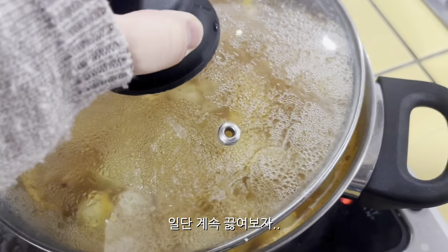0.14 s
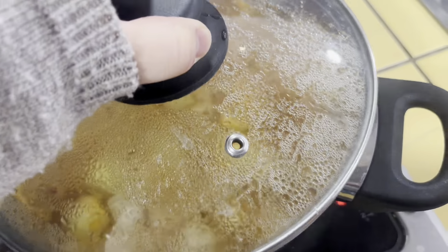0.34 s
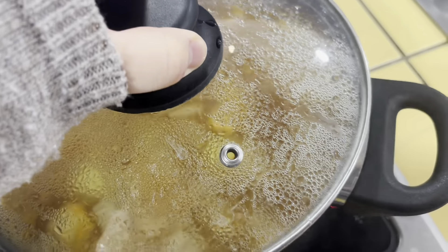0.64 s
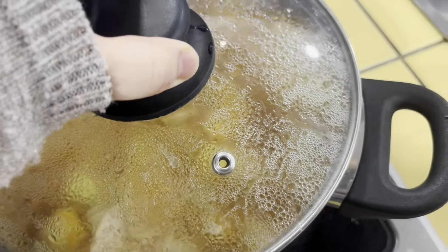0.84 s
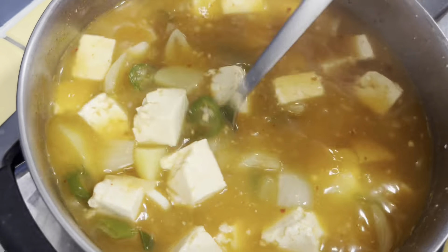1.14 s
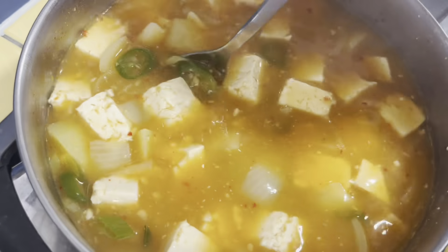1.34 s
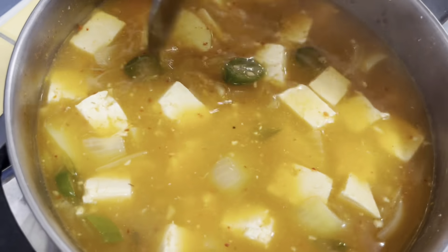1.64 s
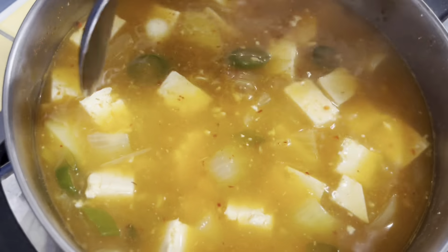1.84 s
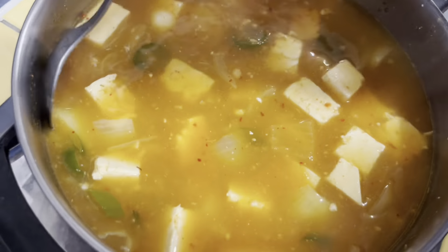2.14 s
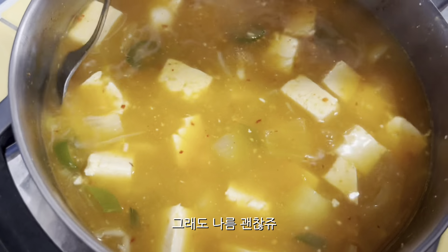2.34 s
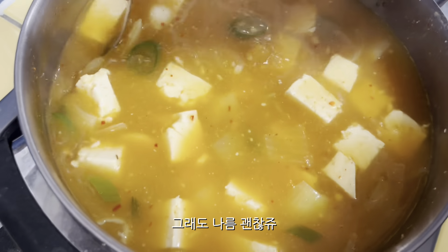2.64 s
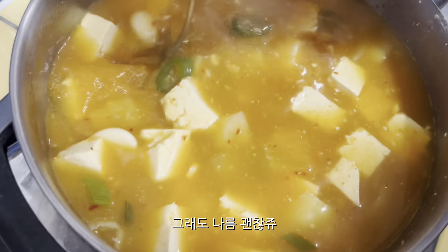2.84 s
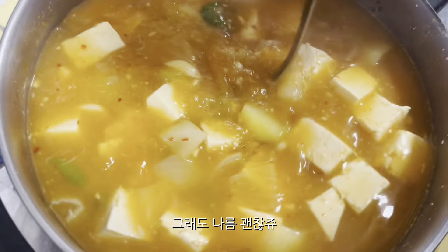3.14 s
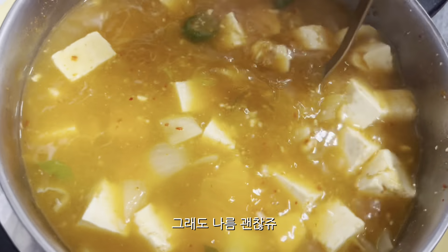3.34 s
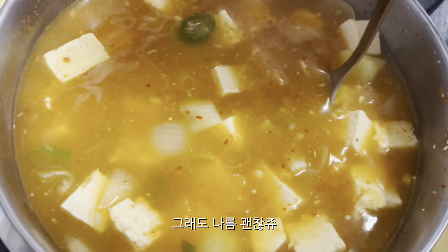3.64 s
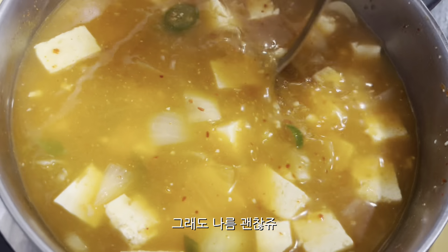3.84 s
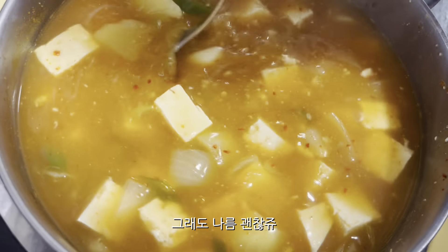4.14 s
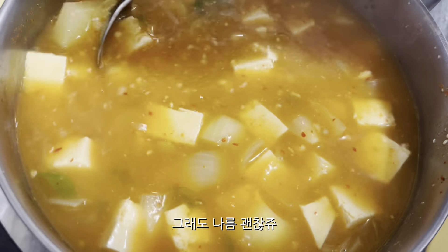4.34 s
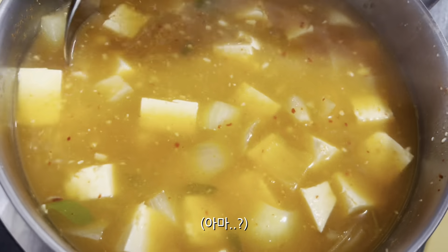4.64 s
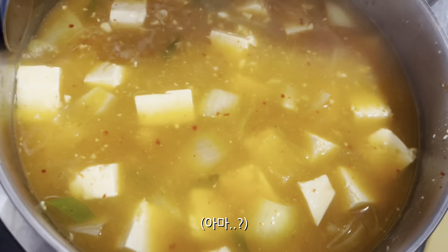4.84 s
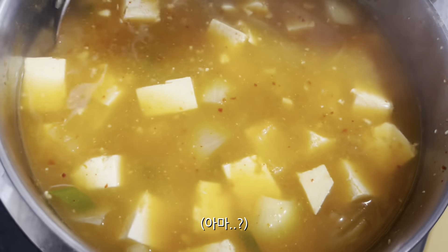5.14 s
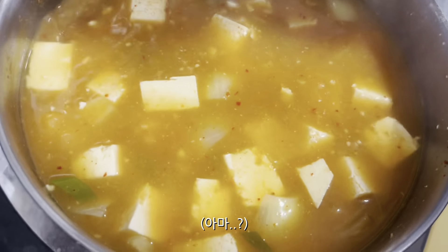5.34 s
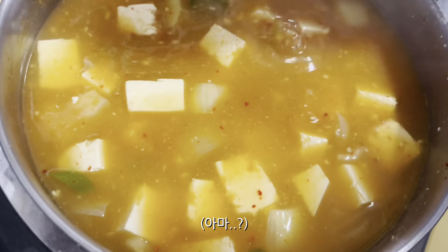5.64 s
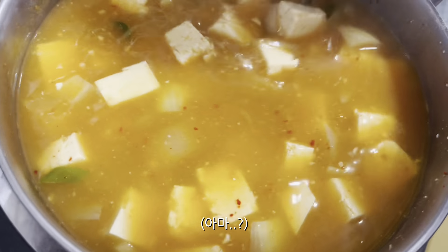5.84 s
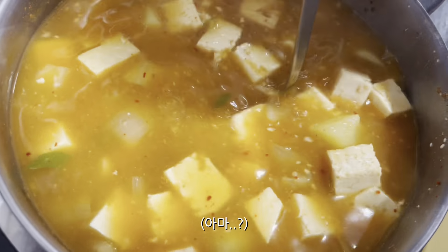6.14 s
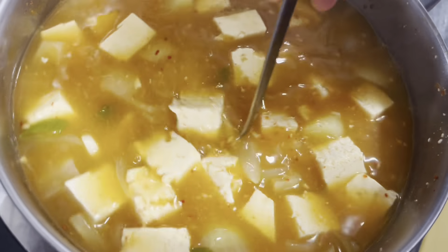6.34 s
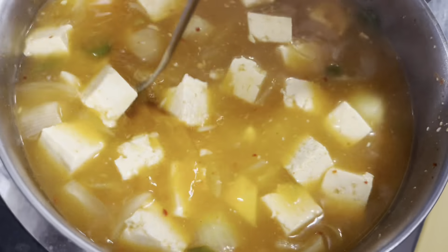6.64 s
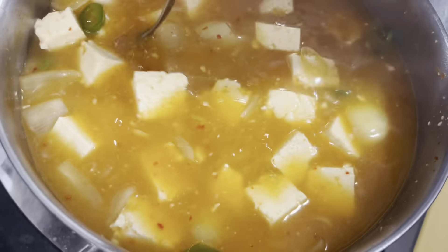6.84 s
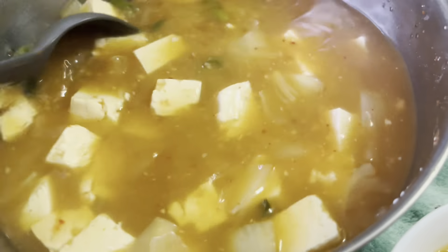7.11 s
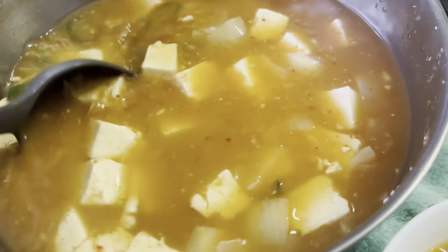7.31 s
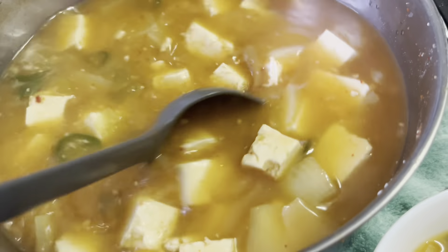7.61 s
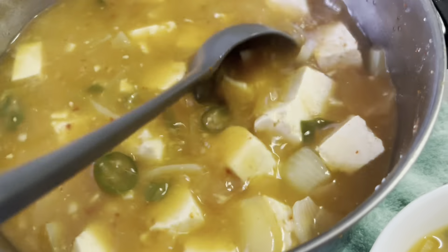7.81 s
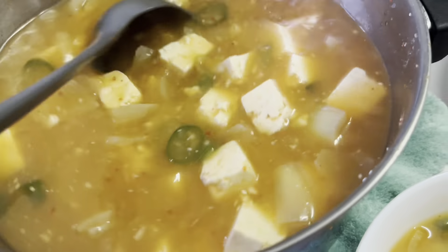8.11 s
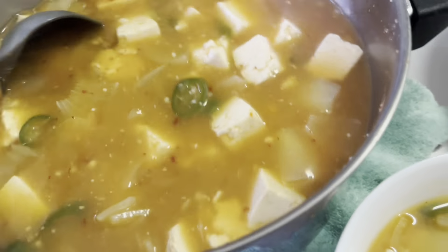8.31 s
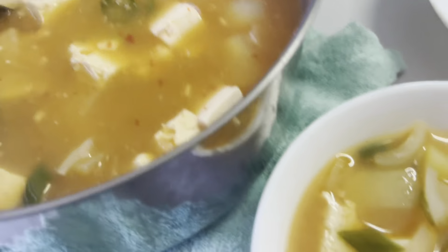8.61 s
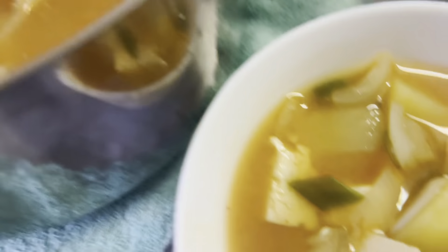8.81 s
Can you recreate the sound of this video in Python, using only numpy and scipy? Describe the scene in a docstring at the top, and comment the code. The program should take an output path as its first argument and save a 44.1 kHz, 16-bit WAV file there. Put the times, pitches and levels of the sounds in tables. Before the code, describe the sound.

Lid rattling on a pot rim gives way to simmering broth with popping bubbles and metal spoon scrapes, cutting abruptly to a faint, quiet kitchen.

```python
"""A thick tofu stew simmers in a steel pot, heard from just above: rumble, churning, plops and crackle. Bubbles
are short gliding notes; broth and rumble are noise and random clicks shaped by spectra. A glass lid clatters
and slides on the rim, from struck modes and streams of slips; then a steel spoon knocks, scrapes and rocks the
pot. Then the quiet kitchen holds sleeve swishes from random clicks and noise, ticks of a ladle from resonated
noise, and a soft handling rumble over room tone."""
import sys
import numpy as np
from scipy import signal
from scipy.fft import rfft, irfft, next_fast_len
from scipy.io import wavfile
from scipy.ndimage import uniform_filter1d

SR = 44100
rng = np.random.default_rng(int(sys.argv[2]) if len(sys.argv) > 2 else 0)


def digitize_waveform(pressure):
    """Quantize a signal to 16-bit integers and store it at the path in sys.argv[1].

    Rows of a 2-D input are taken as channels; values are limited to [-1, 1].
    """
    field = np.atleast_2d(pressure).T
    bounded = np.clip(field, -1, 1)
    quanta = np.round(bounded * 32767).astype(np.int16)
    wavfile.write(sys.argv[1], SR, quanta)


N = 395573
TIME = np.arange(N) / SR  # s
PADDED = next_fast_len(N + SR // 2)
FREQS = np.maximum(np.arange(PADDED // 2 + 1) * SR / PADDED, 1)  # Hz
LID_ENDS_S, STIR_ENDS_S = .920, 6.950

# level of the boil, with the dragged spoon's rumble near 3.8 s, before trims:
# t/s, bottom level/dB, surface level/dB
SIMMER_LEVEL = [(0.0, -41, -53), (0.88, -45, -47.5), (1.0, -50.5, -60.5), (1.28, -47, -53),
                (2.6, -47.5, -50.5), (2.95, -41.5, -44), (3.33, -53, -59.5), (3.64, -53, -58.5),
                (3.76, -42.5, -47.5), (3.9, -40.5, -51), (4.0, -48.5, -58.5), (4.95, -47.5, -57),
                (5.6, -45, -49.5), (6.3, -46.5, -52.5), (6.94, -46.5, -53)]
# low rumble at the bottom: f/Hz, level/dB per Hz
RUMBLE = [(20, -31), (38, -11.5), (55, 5.5), (75, 1), (98, 6), (130, -2), (200, -15.5), (400, -83.5)]
# churning of the thick broth: f/Hz, level/dB per Hz
CHURN = [(100, -18.5), (150, -8), (190, 15.5), (230, -0.5), (280, 4), (370, -6.5), (520, -4), (1000, -47)]
# lapping of the thick broth: f/Hz, level/dB per Hz
SLOSH = [(200, 0.5), (330, -10), (800, 0), (1200, -15), (2200, -16), (2700, -28), (3500, -30.5),
         (8000, -41.5), (15500, -62.5)]
# crackle of the surface: f/Hz, level/dB per Hz
BROTH = [(250, 0), (450, -11), (800, -3), (1200, -18), (2000, -29), (3200, -35), (5000, -45), (8000, -31),
         (11000, -41), (15500, -50)]
SEETHE_PER_S, SEETHE_DB = 9.8, 1.17  # uneven surges: rate, spread
CHURN_DB, COVERED_CHURN_DB = -5.5, 4  # churning against the rumble; its extra gain under the lid
LAPS_PER_S, LAP_DECAY_S, LAP_SPREAD_DB = 14, 0.013, 4.5
LAP_REST = 0.13  # steady part of the lapping, against laps of unit power
CRACKLE_HZ = np.geomspace(380, 11000, 17)
CRACKLE_PER_S, CRACKLE_SPREAD_DB, CRACKLE_Q = 420, 3.3, 5
CLUSTER_DB = 2.5  # spread of the crackle's slow swings


def simmer():
    """Steam (near 3.8 s also the dragged spoon) rumbles low, broth churns and laps, bubbles crackle on top."""
    rumble, wet = gains(SIMMER_LEVEL) * from_db(SEETHE_DB * drift(SEETHE_PER_S))
    deep = rumble * colour(rng.standard_normal(N), RUMBLE)
    churn_gain = from_db(CHURN_DB + COVERED_CHURN_DB * until(LID_ENDS_S))
    churning = churn_gain * rumble * colour(grains(700, 1.5), CHURN)

    # each lap starts suddenly, then dies away
    lap_decay = np.exp(-1 / (LAP_DECAY_S * SR))
    laps = signal.lfilter([1], [1, -lap_decay], np.abs(grains(LAPS_PER_S, LAP_SPREAD_DB)))
    lapping = colour(grains(2000, 3.0) * (LAP_REST + rms_one(laps)), SLOSH)

    pops = np.zeros(N)
    for hz in CRACKLE_HZ:
        clicks = grains(CRACKLE_PER_S / len(CRACKLE_HZ), CRACKLE_SPREAD_DB) + 1e-18
        pops += signal.lfilter(*signal.iirpeak(hz, CRACKLE_Q, SR), clicks)
    crackle = colour(pops * from_db(CLUSTER_DB * drift(22)), BROTH)

    small = np.zeros(N)
    for when, size, strength in rng.random((900, 3)):
        level = from_db(-16 * strength - 20 * size)  # the higher notes are weaker
        add(small, when * STIR_ENDS_S, level * bubble(360 * 6.5 ** size, cycles=15, rise=.08))
    return [deep + from_db(-6.0) * wet * crackle,
            churning + from_db(-8) * wet * rms_one(small),
            from_db(-10.0) * wet * lapping]


# largest plops in the broth, before trims: t/s, level/dB, f/Hz, snap level/dB
PLOPS = [(1.014, -41, 474, -56), (1.102, -44.5, 894, -66), (1.241, -48, 845, -66), (1.35, -41.5, 800, -61),
         (1.384, -41.5, 860, -63), (1.442, -42, 470, -61), (1.479, -37, 830, -61), (1.551, -42, 460, -62),
         (1.561, -42, 790, -68), (1.653, -33.5, 760, -63), (1.733, -54, 439, -60), (1.801, -37.5, 450, -58),
         (1.812, -43.5, 844, -70), (1.931, -42.5, 830, -58), (2.289, -41, 416, -55), (2.535, -35, 447, -51),
         (2.709, -49, 810, -61.5), (2.968, -30.5, 370, -54), (3.067, -45, 1096, -55),
         (3.276, -43, 840, -67), (3.585, -39.5, 810, -57), (3.603, -41, 470, -64), (3.698, -48, 450, -58.5),
         (3.806, -43, 480, -59), (3.967, -33, 830, -64), (3.997, -39.5, 450, -59.5),
         (4.079, -34, 435, -52.5), (4.199, -37, 800, -57.5), (4.219, -32.5, 813, -60),
         (4.246, -36.5, 560, -61), (4.291, -37, 720, -58.5), (4.422, -37.5, 425, -67),
         (4.506, -37, 463, -63), (4.651, -46, 460, -78), (4.899, -41.5, 797, -63), (5.063, -39, 834, -57),
         (5.162, -35.5, 795, -65), (5.368, -38, 614, -57), (5.445, -38, 433, -54), (6.171, -52, 470, -52),
         (6.315, -42, 431, -56), (6.415, -43, 403.3, -57), (6.418, -41, 885, -64), (6.459, -44, 712, -52),
         (6.551, -37.5, 405, -61), (6.789, -38, 450, -48.5), (6.863, -27, 394, -60)]
# clearest clicks of bursting films, before trims: t/s, level/dB
FILM_CLICKS = [(3.9436, -54), (4.5988, -48.5), (4.832, -56.5), (4.861, -53.5), (6.3557, -50), (6.459, -57),
               (6.478, -53)]
# largest low bumps: steam pockets, and near 3.8 s the pot rocking under the dragged spoon:
# t/s, level/dB, f/Hz
BUMPS = [(1.248, -38, 134), (1.522, -34.5, 179), (2.788, -36, 128), (3.448, -33, 102), (3.76, -32, 56.7),
         (3.851, -34, 56.3), (4.175, -34, 96.3), (5.913, -38, 110), (6.142, -37, 112.6)]
# lesser events come at random: rate, strongest level before trims, spread below it
PLOPS_PER_S, LESSER_PLOP_DB, PLOP_SPREAD_DB = 24, -47, 10
FILMS_PER_S, LESSER_FILM_DB, FILM_SPREAD_DB = 6.2, -59, 9
BUMPS_PER_S, LESSER_BUMP_DB, BUMP_SPREAD_DB = 5.7, -42.5, 12.5
PLOP_LOW_HZ, PLOP_HIGH_HZ, BUMP_LOW_HZ, BUMP_HIGH_HZ = 340, 850, 96, 126
PLOP_RING_DB, PLOP_CYCLES = 2, 14  # trim of a plop's ring; cycles to fall 60 dB
PLOP_GLIDE = -0.058  # negative: the pitch falls
LESSER_SNAP_DB = -25.5  # snap of a lesser plop against its level
SNAP_RING_DB, SNAP_CYCLES, SNAP_LOW_HZ, SNAP_HIGH_HZ = 5, 9, 1150, 2310  # the torn film rings briefly
FILM_SNAP_DB = -7.5  # trim of a film's share of the snap sound


def plops():
    """Bubbles snap and ring at three spots; films click; steam pockets and the rocking pot bump low."""
    spots = np.zeros((3, N))
    bumps, snaps, ticks = np.zeros((3, N))
    chance_plops = at_random(PLOPS_PER_S, LESSER_PLOP_DB, PLOP_SPREAD_DB, PLOP_LOW_HZ, PLOP_HIGH_HZ)
    lesser = [(s, db, hz, db + LESSER_SNAP_DB) for s, db, hz in chance_plops]
    for k, (s, db, hz, snap_db) in enumerate(list(PLOPS) + lesser):
        spot = spots[k % len(spots)]
        film_hz = rng.uniform(SNAP_LOW_HZ, SNAP_HIGH_HZ)
        add(spot, s, from_db(db + PLOP_RING_DB) * bubble(hz, PLOP_CYCLES, PLOP_GLIDE))
        add(spot, s, from_db(snap_db + SNAP_RING_DB) * bubble(film_hz, SNAP_CYCLES, PLOP_GLIDE))
        add(snaps, s, from_db([snap_db]))

    chance_films = at_random(FILMS_PER_S, LESSER_FILM_DB, FILM_SPREAD_DB)
    for s, db, *_ in list(FILM_CLICKS) + chance_films:
        add(snaps, s, from_db([db + FILM_SNAP_DB]))
        add(ticks, s, from_db([db]))

    chance_bumps = at_random(BUMPS_PER_S, LESSER_BUMP_DB, BUMP_SPREAD_DB, BUMP_LOW_HZ, BUMP_HIGH_HZ)
    for s, db, hz in list(BUMPS) + chance_bumps:
        add(bumps, s, from_db(db) * bubble(hz, cycles=20, rise=.02))

    snap_spectrum = [(300, -12.5), (900, 16.5), (2200, 3.5), (2800, -9), (3600, -12), (5000, -25),
                     (8500, -22.5), (15500, -23.0)]
    tick_spectrum = [(1500, -4.5), (5000, -9.0), (8000, 19), (11000, -2), (15500, -15.0)]
    snap = from_db(-73.0) * colour(snaps, snap_spectrum)
    tick = from_db(-83.0) * colour(ticks, tick_spectrum)
    return [*spots, bumps + snap + tick]


def bubble(hz, cycles, rise):
    """A short bubble-like note, falling 60 dB in some cycles while its pitch glides."""
    t = TIME[:SR // 6]
    age = t * hz / cycles
    swell = 1 - np.exp(-t * hz * 4.5)
    return from_db(-60 * age) * swell * np.sin(2 * np.pi * hz * t * (1 + rise * np.minimum(age, 1)))


def at_random(per_s, top_db, spread_db, low_hz=1, high_hz=1):
    """Rows (t/s, level/dB, f/Hz) of chance events before the stirring sounds stop."""
    wait, size, pitch = rng.random((400, 3)).T
    times = np.cumsum(-np.log(1 - wait)) / per_s
    rows = np.transpose([times, top_db - spread_db * size, low_hz * (high_hz / low_hz) ** pitch])
    return [tuple(row) for row in rows if row[0] < STIR_ENDS_S]


# spoon on the pot; the last row is the body of a heavy plop; before trims:
# t/s, thud level/dB, clank level/dB, ring level/dB, struck spot's note f/Hz, note level/dB
POT_KNOCKS = [(1.995, -29, -31, -49.5, 1780, -24.5), (2.37, -38.5, -32.5, -34, 2000, -33.5),
              (2.797, -46, -42.5, -50.5, 2240, -47), (2.987, -48.5, -55.5, -67, 367, -39),
              (3.748, -47, -53, -67, 183.6, -33.5), (3.847, -45, -66, -66.5, 200, -31.5),
              (4.776, -31.5, -35, -75, 363, -34.5), (4.795, -29, -42, -58.5, 358, -30),
              (5.082, -47, -44, -50.5, 770, -49), (5.545, -36.5, -38.5, -36.5, 1330, -42),
              (5.667, -44, -36.5, -40, 1350, -32.5), (6.808, -43, -36.5, -40, 1400, -37),
              (6.864, -46.5, -38, -78, 381.5, -38)]
# modes of the full pot: f/Hz, level/dB, t60/s
POT_MODES = [(190.8, 2, 0.18), (360.6, 1, 0.12), (508, -2.5, 0.058), (741, -9.5, 0.14), (860, -2.5, 0.072),
             (1330, -21.5, 0.1), (1750, -25.5, 0.018), (1990, -17, 0.028), (3360, 1, 0.025),
             (8050, -2.5, 0.025)]
# strokes along the steel, before trims: start t/s, firmest t/s, end t/s, grit level/dB, hiss level/dB
STROKES = [(2.09, 2.33, 2.35, -65.5, -62), (2.38, 2.41, 2.8, -69, -77), (2.49, 2.575, 2.623, -52.5, -60.5),
           (2.8, 2.82, 2.98, -55, -57), (2.96, 3.015, 3.067, -58.5, -58), (3.05, 3.07, 3.2, -68.5, -78),
           (5.085, 5.11, 5.18, -63, -57), (5.22, 5.29, 5.37, -62, -57), (5.39, 5.58, 5.8, -61.5, -60),
           (5.67, 5.69, 5.91, -60, -64.5), (5.98, 6.13, 6.25, -64, -66), (6.22, 6.29, 6.5, -70.5, -72),
           (6.812, 6.83, 7.03, -58, -71)]
# steady resonances of the dragged spoon: f/Hz, width/Hz, level/dB
SPOON_MODES = [(2140, 180, -0.5), (2850, 66, -2.5), (5870, 120, -12.5), (7040, 41, -22.5),
               (6800, 28, -21.5), (7200, 180, -8.5), (8380, 84, -1), (9540, 300, -8.5)]
# scrape of steel on steel: f/Hz, level/dB per Hz
SCRAPE = [(300, 10), (800, -1.5), (1300, -9), (2200, -15.5), (3300, -9), (4500, -17.5), (6000, -18.5),
          (7200, -12), (8400, -15), (10500, -25.5), (13000, -23), (15500, -28)]
PRESSURE_DB, PRESSURE_PER_S = 0.5, 18  # the hand presses unevenly: spread, rate
# each slip returns from the rim, sooner or later as the spoon travels
SLIP_ECHO_S, CONTACT_TRAVEL, SLIP_ECHO_DB = 0.000469, 0.057, -11


def spoon():
    """Spoon knocks (and one heavy plop) ring the pot; the drag is tiny uneven slips that the steel colours."""
    struck = knocks(POT_KNOCKS, POT_MODES, ring_db=2.0,
                    clatter_db=[(200, -25.5), (800, -27.5), (3000, -27), (10000, -23.0)],
                    clatter_length=0.24, swell_cycles=1.8, detune=0.31,
                    crack_db=3.5, tick_db=2.0, note_cycles=40.4)
    strokes = swells(STROKES, ease_in_db=9.0, ease_out_db=7.0, attack_s=0.014, release_s=0.028)
    grit, hiss = strokes * from_db(PRESSURE_DB * drift(PRESSURE_PER_S))
    slips = grains(7000, 3.2) * from_db(2.2 * drift(160))

    # many narrow steel modes come and go as the point of contact travels
    steel = np.zeros(N)
    for hz in np.geomspace(900, 12000, 44):
        steel += from_db(4.2 * drift(22)) * signal.lfilter(*signal.iirpeak(hz, hz / 90, SR), slips)
    rubbed = rms_one(steel) + from_db(-3) * rms_one(slips)
    echo_delay = SLIP_ECHO_S * np.exp(CONTACT_TRAVEL * drift(9))
    returned = np.interp(TIME - echo_delay, TIME, rubbed)

    resonances = sum(from_db(db) * resonate(slips, hz, width) for hz, width, db in SPOON_MODES)
    scrape = colour(rubbed + from_db(SLIP_ECHO_DB) * returned, SCRAPE)
    scrape = scrape + from_db(-18) * rms_one(resonances)
    low = signal.sosfilt(signal.butter(2, [700, 6000], "band", fs=SR, output="sos"), scrape)
    high = signal.sosfilt(signal.butter(4, 6500, "high", fs=SR, output="sos"), scrape)
    return [struck, from_db(2.5) * grit * rms_one(low) + from_db(7.0) * hiss * rms_one(high)]


# lid on the rim, before trims: t/s, thud level/dB, clank level/dB, ring level/dB,
# struck spot's note f/Hz, note level/dB
LID_KNOCKS = [(0.010, -19, -20.5, -36, 810, -13), (0.034, -27, -23, -37, 730, -16),
              (0.138, -23, -19.5, -30, 655, -12.5), (0.159, -28, -42, -43, 1420, -30),
              (0.232, -37.5, -38, -52, 650, -30), (0.246, -38.5, -36, -47.5, 1420, -34.5),
              (0.275, -39, -42, -48, 624, -29), (0.383, -38, -48.5, -54.5, 580, -27),
              (0.472, -52, -60, -85, 1580, -44), (0.494, -26, -44, -45, 610, -18),
              (0.509, -22, -43, -50.5, 294, -27), (0.587, -37, -41.5, -50, 1150, -32),
              (0.609, -43.5, -49, -59, 1010, -33), (0.693, -39, -43, -56, 1270, -32),
              (0.718, -50, -47, -70, 1330, -48), (0.738, -40.5, -46.5, -73, 1230, -31),
              (0.755, -32, -52, -65, 273, -38), (0.843, -38, -64, -59, 300, -32),
              (0.885, -20, -32, -43.5, 289.4, -27), (0.905, -21, -29.5, -45.5, 860, -18.5)]
# modes of the lid lying on the pot: f/Hz, level/dB, t60/s
LID_MODES = [(180, -2, .25), (196, -5, .3), (258, -2, .2), (295, -3, .12), (505, -1, .14), (625, -5, .18),
             (664, -2, .22), (752, -1, .1), (790, 0, .11), (910, -5, .05), (1045, -4, .07), (1175, -3, .09),
             (1320, -1, .11), (1400, 3, .13), (1470, 0, .06), (1548, 2, .08), (2032, -2.5, .16),
             (2075, -11, .12), (2363, -7, .06), (2460, -10, .12), (2956, -9, .45), (3520, -9, .17),
             (3640, -6, .11), (3747, -10, .48), (4208, -2, .11), (4230, 2, .15), (4410, -11, .12),
             (4690, -12, .11), (5150, -8, .08), (5195, -3, .15), (5780, -12, .14), (6165, -6, .11),
             (8048, -12, .16), (8950, -14, .15)]
# slides on the rim, before trims: start t/s, firmest t/s, end t/s, grating level/dB,
# squeal level/dB, squeal f/Hz
SLIDES = [(0.046, 0.063, 0.17, -42, -44.5, 658), (0.128, 0.16, 0.2, -41, -42.5, 684),
          (0.227, 0.275, 0.29, -44, -37.5, 617), (0.583, 0.632, 0.64, -45, -44, 1006),
          (0.69, 0.716, 0.745, -46, -48, 1334), (0.8, 0.822, 0.83, -58, -46.5, 1267),
          (0.839, 0.857, 0.875, -49, -38.5, 272)]
# grating on the rim: f/Hz, level/dB per Hz
RIM = [(200, -16.5), (400, 2.5), (620, -5), (900, -2), (1350, -6.5), (1800, -33), (4200, -29),
       (6000, -30.5), (9000, -28.5), (15500, -46)]
SQUEAL_WIDTH_HZ = 15


def lid():
    """The lid clatters on the rim; sliding, it grates and squeals at a pitch set by where its edge bears."""
    clatter_db = [(200, -32.5), (800, -23), (1200, -27), (1500, -25), (1850, -37), (3000, -29.5),
                  (4200, -25), (10000, -20)]
    clatter = knocks(LID_KNOCKS, LID_MODES, ring_db=-5.5, clatter_db=clatter_db,
                     clatter_length=0.77, swell_cycles=0.44, detune=0.12,
                     crack_db=-7, tick_db=-0.5, note_cycles=15)
    slips = grains(2500, 4.2)
    singing = np.zeros(N)
    for hz, db, t60 in LID_MODES:
        singing += from_db(db) * signal.lfilter(*signal.iirpeak(hz, hz * t60 / 4, SR), slips)
    singing_spectrum = [(200, -1), (650, 5), (1400, 1.5), (2200, -7), (5000, -4.5), (9000, -13)]
    grating = from_db(-4) * colour(slips, RIM) + from_db(-8.0) * colour(singing, singing_spectrum)
    sliding = np.zeros(N)
    for *stroke, hz in SLIDES:
        grate, squeal = swells([stroke], ease_in_db=8.0, ease_out_db=5.5,
                               attack_s=0.0049, release_s=0.036)
        squealing = resonate(grains(1500, 0.66), hz, SQUEAL_WIDTH_HZ)
        sliding += grate * grating + squeal * squealing
    return [clatter + sliding]


# dense clatter after a contact, before its length factor: f/Hz, t60/s
CLATTER_T60 = [(200, .09), (800, .05), (3000, .04), (12000, .025)]
CLATTER_TAIL_DB = -20  # slower tail of the clatter, against its start
DAMPING_DB, UNDAMPED_ABOVE_HZ = -4, 2800  # a new touch damps the sound; modes above this ring on


def knocks(table, modes, ring_db, clatter_db, clatter_length, swell_cycles, detune,
           crack_db, tick_db, note_cycles):
    """Each contact cracks, rings the spot's note and the body's modes, and clatters; low modes swell slowest."""
    out, sustained = np.zeros((2, N))
    t = TIME[:SR // 2]
    edges = np.geomspace(130, 16500, 15)
    bands = [signal.butter(2, pair, "band", fs=SR, output="sos") for pair in zip(edges, edges[1:])]
    for s, thud, clank, ring, note_hz, note_db in table:
        out *= 1 + (from_db(DAMPING_DB) - 1) * (1 - until(s + 0.0013))
        add(out, s, from_db(clank + crack_db - 60 * t / 0.0026) * np.sin(2 * np.pi * 1500 * t))
        note_fall = from_db(note_db - 60 * t * note_hz / note_cycles)
        add(out, s, note_fall * np.sin(2 * np.pi * note_hz * t))
        force = [(300, thud), (600, clank), (1500, clank - 3), (2200, ring), (5000, ring - 2),
                 (8500, ring + tick_db), (16000, ring + tick_db - 10.5)]
        for hz, level_db, t60 in modes:
            mode_db = at_hz(force, hz) + level_db + ring_db + 2 * rng.normal()
            strength = from_db(mode_db) * rng.choice([-1, 1])
            swell = 1 - np.exp(-t * hz / swell_cycles)
            pitch = hz + detune * np.sqrt(hz) * rng.normal()  # the point of contact shifts each mode
            tone = strength * swell * from_db(-60 * t / t60) * np.sin(2 * np.pi * pitch * t)
            add(sustained if hz > UNDAMPED_ABOVE_HZ else out, s, tone)
        for band, hz in zip(bands, np.sqrt(edges[1:] * edges[:-1])):
            dying = from_db(-60 * t / (clatter_length * at_hz(CLATTER_T60, hz)))
            dying = dying + from_db(CLATTER_TAIL_DB - 60 * t / .25)
            burst = signal.sosfilt(band, rng.standard_normal(len(t)) * dying)
            add(out, s, from_db(at_hz(force, hz) + at_hz(clatter_db, hz)) * rms_one(burst))
    return out + sustained


# sleeve brushing as the arm moves, before trims: start t/s, firmest t/s, end t/s,
# rub level/dB, hiss level/dB, rasp level/dB, rasp f/Hz
SLEEVE = [(7.141, 7.198, 7.33, -68, -68, -81, 3086), (7.472, 7.57, 7.72, -87, -69.5, -78, 3660),
          (7.701, 7.75, 8.17, -85, -75.5, -87.5, 4495), (8.44, 8.465, 8.53, -74.5, -74, -95, 1496),
          (8.644, 8.676, 8.85, -85, -80, -80.5, 2477)]
# dull rub of the cloth: f/Hz, level/dB per Hz
SLEEVE_RUB = [(200, 0), (450, 1.5), (800, -1.5), (1450, 1), (1900, -11), (2500, -3.5), (3300, -2.5),
              (5000, -19), (9000, -35)]
# bright hiss of the fibres: f/Hz, level/dB per Hz
SLEEVE_HISS = [(2000, -10), (4000, -13), (7500, 10.5), (12000, 10), (15500, 3.5)]
RASP_WIDTH_HZ = 500


def sleeve():
    """Wool fibres catch and slip in faint swishes, each with a rasp of its own."""
    rubbing = colour(rng.standard_normal((2, N)), SLEEVE_RUB)
    fibres = colour(grains(17000, 4.8), SLEEVE_HISS)
    catching = grains(5000, 3.8)
    out = np.zeros((2, N))
    for *stroke, hz in SLEEVE:
        rub, hiss, rasp = swells([stroke], ease_in_db=8, ease_out_db=7, attack_s=0.11, release_s=0.17)
        out += from_db(2.5) * rub * rubbing
        out += from_db(-3.5) * hiss * fibres
        out += rasp * resonate(catching, hz, RASP_WIDTH_HZ)
    return out * from_db(1.6 * drift(12) + 1.9 * drift(90))


# light ticks of the plastic ladle: t/s, peak level/dB, f/Hz
LADLE_TICKS = [(7.059, -63, 2850), (8.049, -72, 3340)]


def ladle():
    """Each tick of the ladle is a dry scratch through one broad resonance."""
    out, t = np.zeros(N), TIME[:SR // 20]
    for s, db, hz in LADLE_TICKS:
        scratch = rng.standard_normal(len(t)) * from_db(-60 * t / 0.031)
        tick = resonate(scratch, hz, width_hz=900)
        add(out, s, from_db(db) * tick / np.abs(tick).max())
    return out


# handling rumble, before trims: start t/s, firmest t/s, end t/s, level/dB
HANDLING = [(7.2, 7.4, 7.69, -62.5), (8.585, 8.73, 9.05, -47)]
# rumble of the hand: f/Hz, level/dB per Hz
HAND = [(30, -32), (60, 2.5), (125, 10.5), (190, -5), (260, 5), (400, -13), (600, -40), (1500, -57)]


def handling():
    """Handling is a low noise swell, mostly central with a little opposed between the sides."""
    swell = swells(HANDLING, ease_in_db=8.5, ease_out_db=20, attack_s=0.037, release_s=0.038)[0]
    centre, wide = swell * colour(rng.standard_normal((2, N)), HAND)
    return from_db(-1) * centre + from_db(-18) * wide * np.array([[1], [-1]])


# room tone shared by both sides: f/Hz, level/dB per Hz
ROOM = [(30, -5.5), (60, 7), (110, 0), (200, -13), (350, -13), (600, -27), (1500, -27.5), (4000, -38),
        (10000, -28), (15500, -44)]


def kitchen():
    """Faint room tone: noise alike on both sides, strongest in the bass, plus a weaker opposed part."""
    wide_spectrum = [(60, 4.5), (300, 5.5), (1500, -5.5), (4000, -11.0), (9000, -8.5), (12000, -21.0)]
    centre = from_db(-70.0) * colour(rng.standard_normal(N), ROOM)
    wide = from_db(-78.0) * colour(rng.standard_normal(N), wide_spectrum)
    return centre + wide * np.array([[1], [-1]])


# lead of the left microphone port: f/Hz, phase/radians
PORT_PHASE = [(100, 0), (400, .25), (860, .8), (1060, 1.6), (1300, 4.1), (2000, 6.2), (5100, 6.1),
              (6300, 3.3), (6750, 3.0), (8600, .2), (10200, -.4), (12200, -2.9), (13500, -3.3),
              (15500, -6.1)]
# left port minus right: f/Hz, level/dB
PORT_BALANCE = [(100, -1.2), (700, -1.2), (1300, 2.5), (4400, 4), (8000, -.5), (15000, 0)]
# reflections from pot wall and tiles against the direct sound: f/Hz, level/dB
REFLECTED = [(100, -15), (300, -5.5), (600, -4.5), (1200, -2), (2000, -4), (4000, -1), (6500, -9),
             (8000, -7), (11000, -9), (13000, -18), (15500, -13)]
EARLY_T60_S, KITCHEN_T60_S, KITCHEN_DB = .04, .28, -16
EVEN_OVER_HZ = 30  # width over which the colour of the path is evened out


def ports(sources):
    """Two ports hear the pot with a phase difference; reflections widen each source but keep its colour."""
    t, sides = TIME[:SR // 3], np.array([[.5], [-.5]])
    balance = from_db(sides * at_hz(PORT_BALANCE, FREQS))
    direct = balance * np.exp(1j * sides * at_hz(PORT_PHASE, FREQS))
    reflected = from_db(at_hz(REFLECTED, FREQS))
    decay = from_db(-60 * t / EARLY_T60_S) + from_db(KITCHEN_DB - 60 * t / KITCHEN_T60_S)
    heard = 0
    for x in sources:
        echoes = rng.standard_normal((2, len(t))) * decay
        echoes /= np.sqrt(np.sum(echoes ** 2, axis=1, keepdims=True))
        path = direct + reflected * rfft(echoes, PADDED)
        mean_power = np.mean(np.abs(path) ** 2, axis=0)
        power = uniform_filter1d(mean_power, size=int(EVEN_OVER_HZ * PADDED / SR))
        evening = causal(np.sqrt((1 + reflected ** 2) / power))
        heard = heard + rfft(x, PADDED) * evening * path
    return irfft(heard, PADDED)[:, :N]


def from_db(db):
    """Decibels to gain."""
    return 10 ** (np.asarray(db) / 20)


def rms_one(x):
    """Scale to unit power."""
    return x / np.sqrt(np.mean(x ** 2) + 1e-20)


def gains(rows, attack_s=0.0083, release_s=0.034):
    """Each dB column as a gain in time, fading in just before its span and out just after."""
    s, *columns = np.transpose(rows)
    inside = np.clip(np.minimum((TIME - s[0]) / attack_s, (s[-1] - TIME) / release_s) + 1, 0, 1)
    return [inside * from_db(np.interp(TIME, s, c)) for c in columns]


def swells(rows, ease_in_db, ease_out_db, attack_s, release_s):
    """Strokes as gains in time: each starts lightly, presses hardest once and eases off."""
    strokes = []
    for start, firmest, end, *db in rows:
        curve = [(start, *np.subtract(db, ease_in_db)),
                 (firmest, *db),
                 (end, *np.subtract(db, ease_out_db))]
        strokes.append(gains(curve, attack_s, release_s))
    return np.sum(strokes, axis=0)


def at_hz(points, hz):
    """Read a table on a log-frequency axis."""
    table_hz, values = np.transpose(points)
    return np.interp(np.log(hz), np.log(table_hz), values)


def causal(gain):
    """The minimum-phase filter that has this gain at each frequency."""
    cepstrum = irfft(np.log(gain), PADDED)
    cepstrum[1:PADDED // 2] *= 2
    cepstrum[PADDED // 2 + 1:] = 0
    return np.exp(rfft(cepstrum))


def colour(x, spectrum):
    """Give x a spectrum with a causal filter; unit power."""
    response = causal(from_db(at_hz(spectrum, FREQS)))
    return rms_one(irfft(rfft(x, PADDED) * response, PADDED)[..., :N])


def resonate(x, hz, width_hz):
    """Pass x through one resonance; unit power."""
    return rms_one(signal.lfilter(*signal.iirpeak(hz, hz / width_hz, SR), x))


def drift(rate):
    """Slow random wandering of unit power, with rate knots a second."""
    knots = rng.standard_normal(4000)
    return rms_one(np.interp(TIME * rate, np.arange(len(knots)), knots))


def grains(per_s, spread_db):
    """Random clicks, mostly small and a few large."""
    sizes = from_db(spread_db * np.minimum(rng.exponential(1, N), 4)) * rng.choice([-1, 1], N)
    return sizes * (rng.random(N) < per_s / SR)


def add(out, s, sound):
    """Mix a sound in at time s."""
    start = max(round(s * SR), 0)
    out[start:start + len(sound)] += sound[:N - start]


def until(s):
    """One, falling to nothing over the last 3 ms before time s."""
    return np.clip((s - TIME) / .003, 0, 1)


def scene():
    """Stew and spoon sound from the pot until 6.95 s and the lid until 0.92 s; the kitchen sounds lie beneath."""
    stirring = ports(simmer() + plops() + spoon()) * until(STIR_ENDS_S)
    covering = ports(lid()) * until(LID_ENDS_S)
    return stirring + covering + sleeve() + ladle() + handling() + kitchen()


def record(dry):
    """The microphone drops the deepest bass; the top is cut steeply."""
    thinned = signal.sosfilt(signal.butter(3, 34, "high", fs=SR, output="sos"), dry)
    return signal.sosfilt(signal.ellip(10, .2, 80, 15850, fs=SR, output="sos"), thinned)


dry = scene()
out = record(dry)
digitize_waveform(out)
```